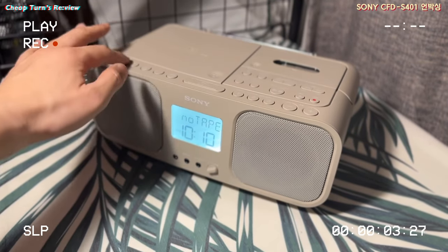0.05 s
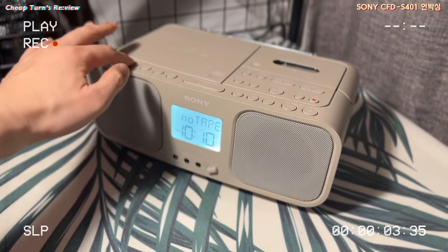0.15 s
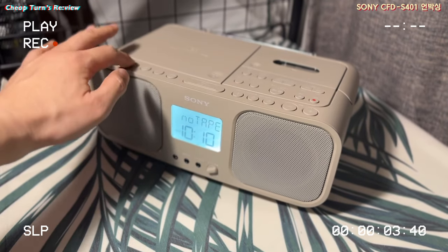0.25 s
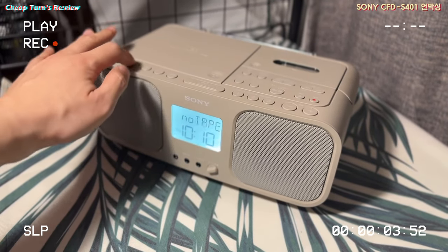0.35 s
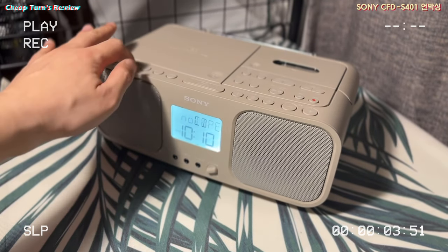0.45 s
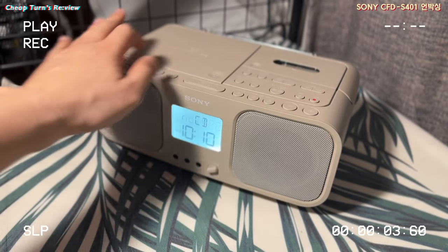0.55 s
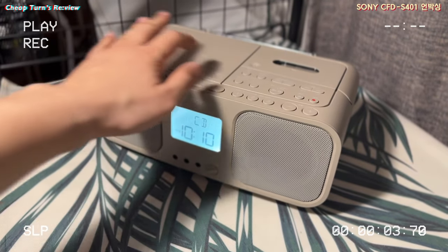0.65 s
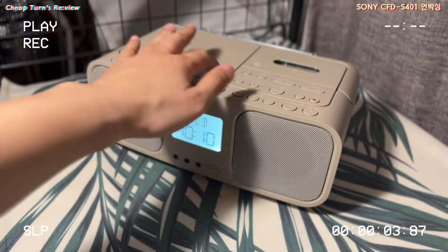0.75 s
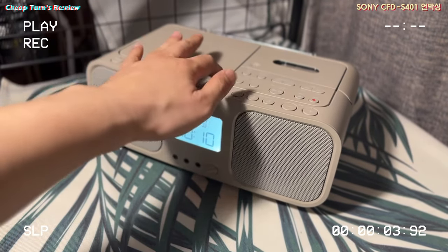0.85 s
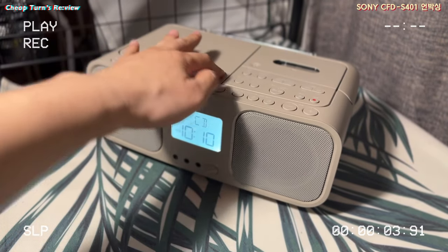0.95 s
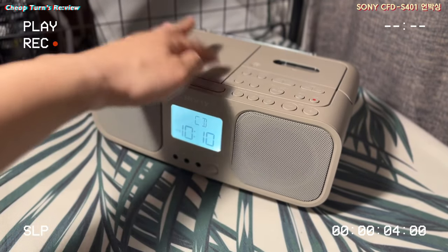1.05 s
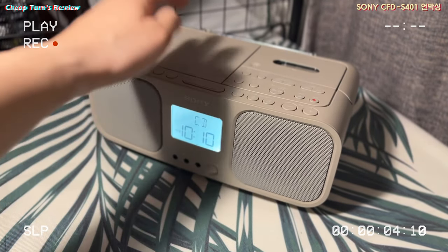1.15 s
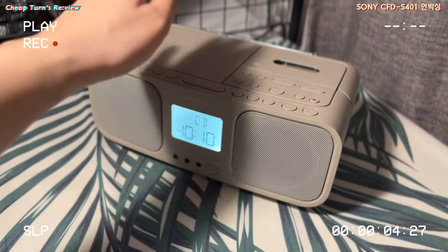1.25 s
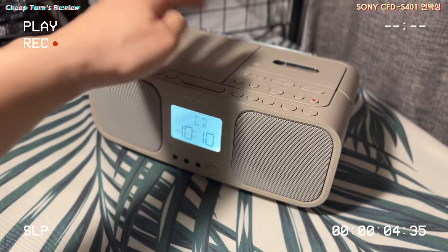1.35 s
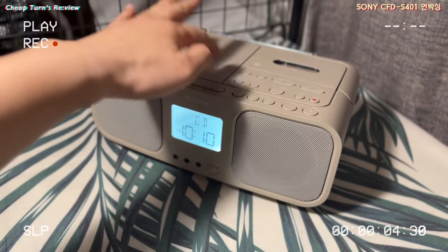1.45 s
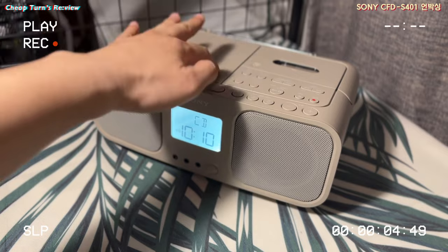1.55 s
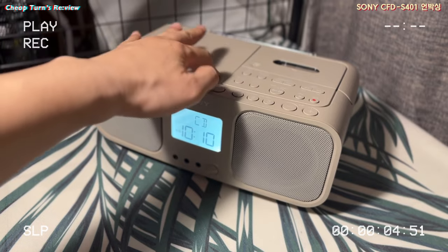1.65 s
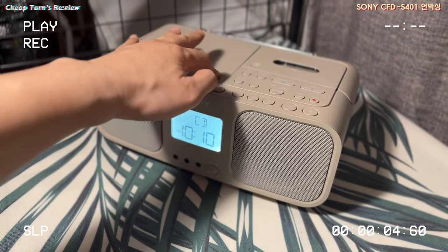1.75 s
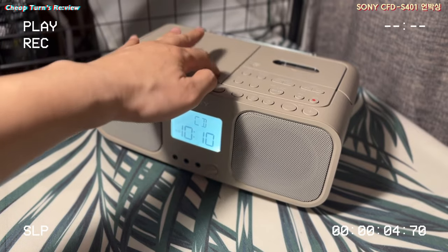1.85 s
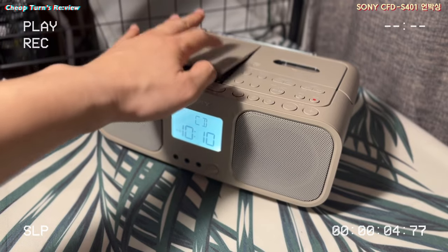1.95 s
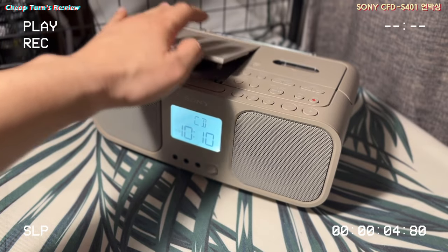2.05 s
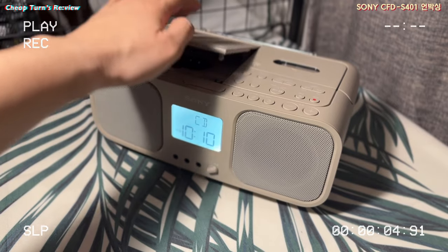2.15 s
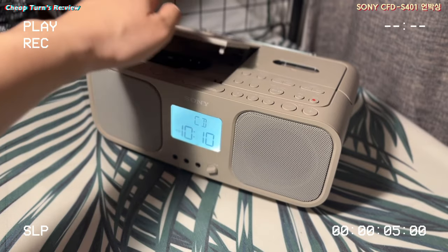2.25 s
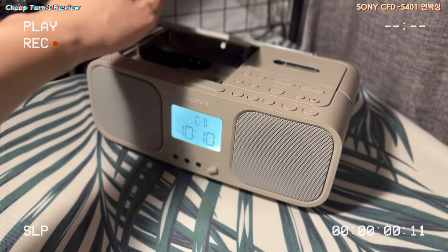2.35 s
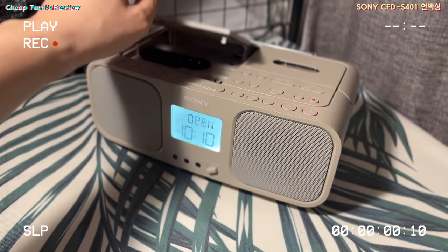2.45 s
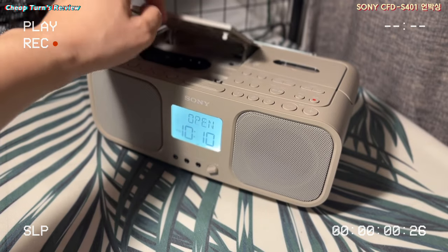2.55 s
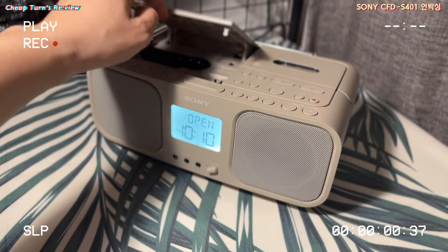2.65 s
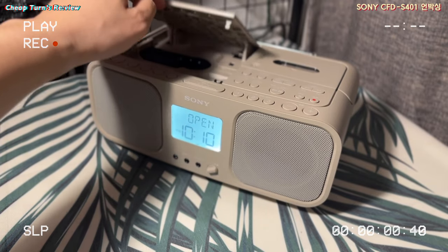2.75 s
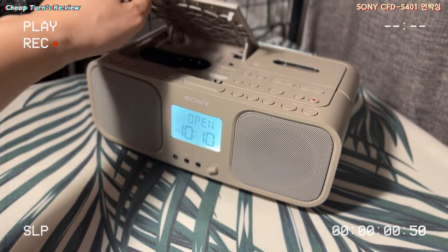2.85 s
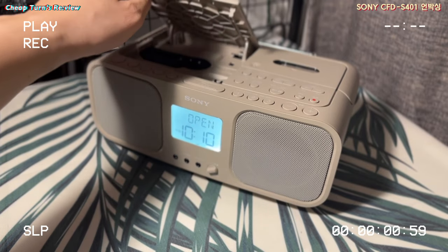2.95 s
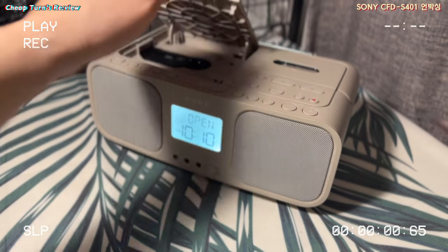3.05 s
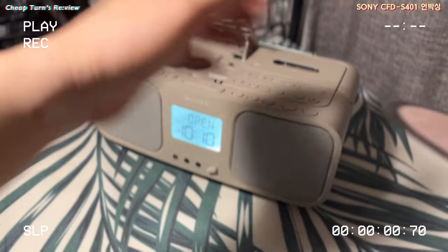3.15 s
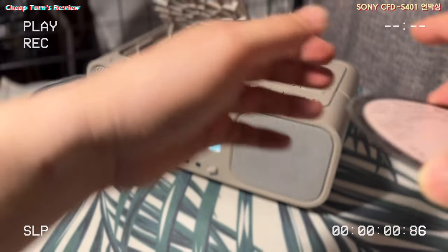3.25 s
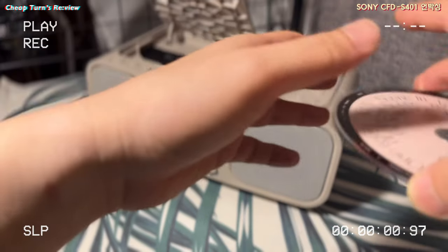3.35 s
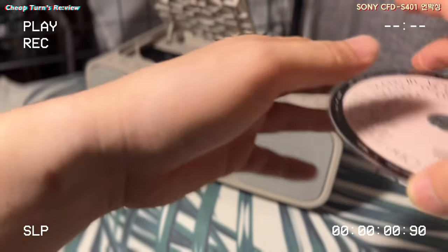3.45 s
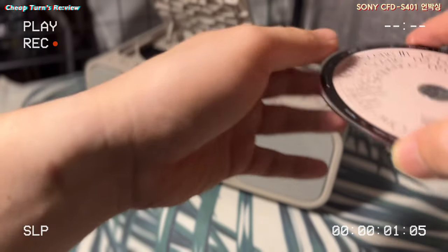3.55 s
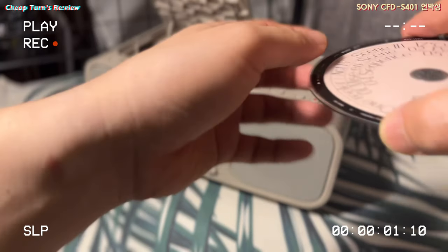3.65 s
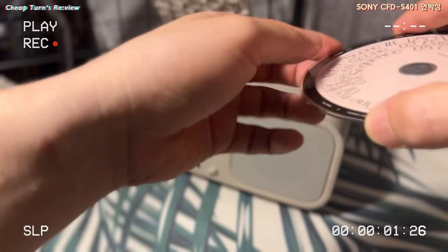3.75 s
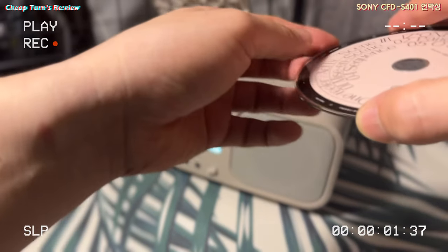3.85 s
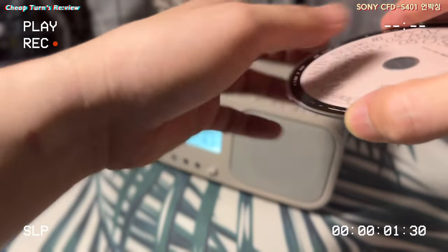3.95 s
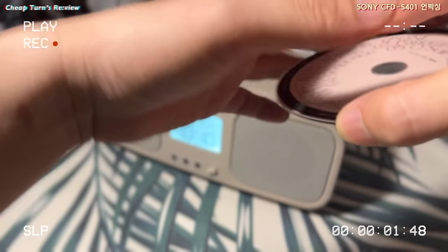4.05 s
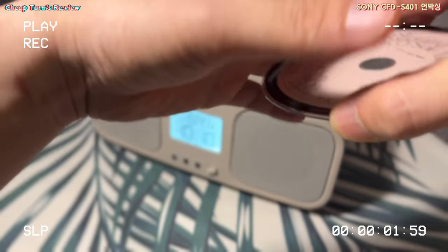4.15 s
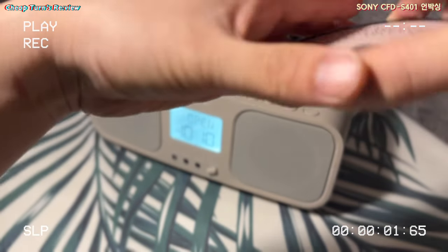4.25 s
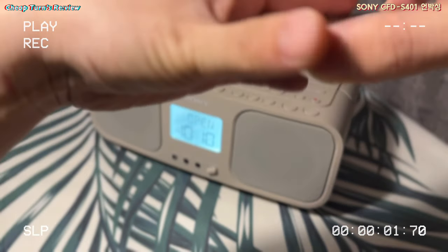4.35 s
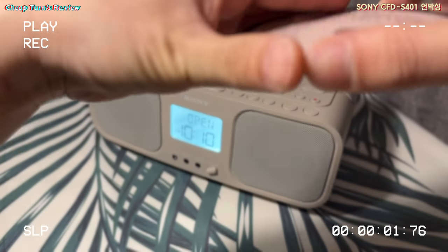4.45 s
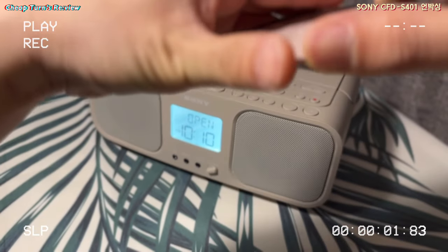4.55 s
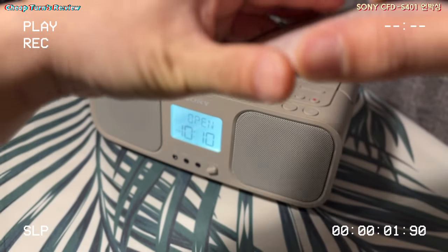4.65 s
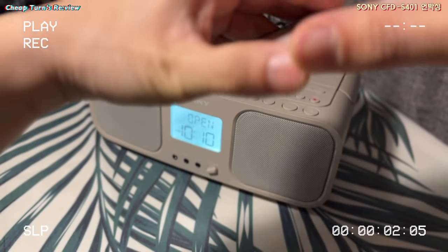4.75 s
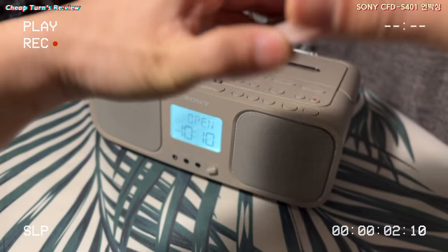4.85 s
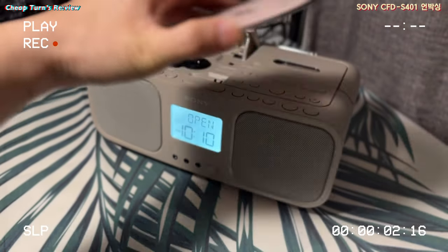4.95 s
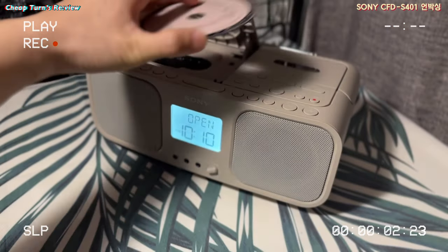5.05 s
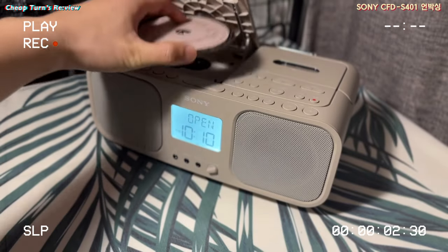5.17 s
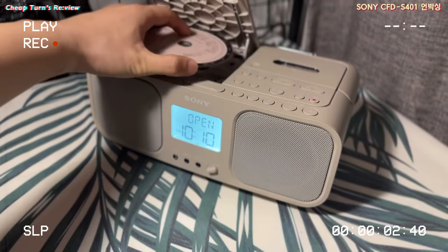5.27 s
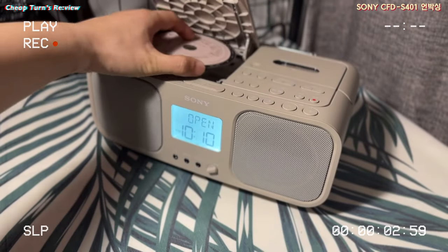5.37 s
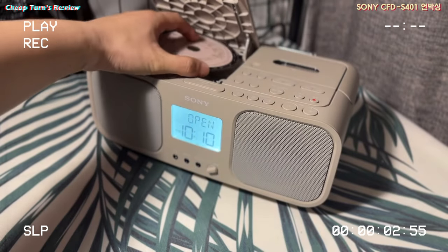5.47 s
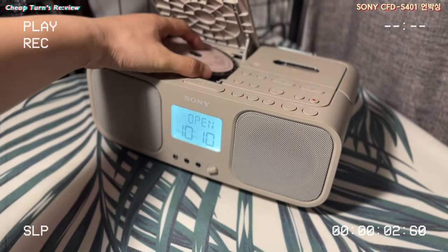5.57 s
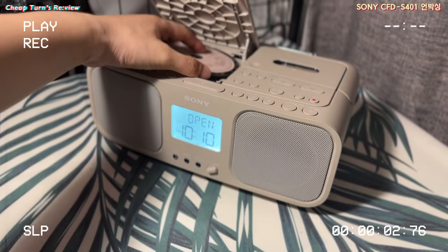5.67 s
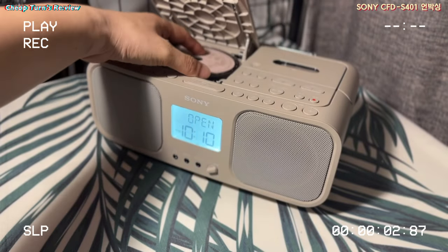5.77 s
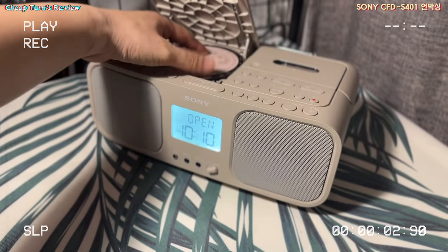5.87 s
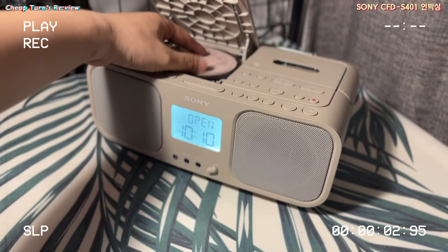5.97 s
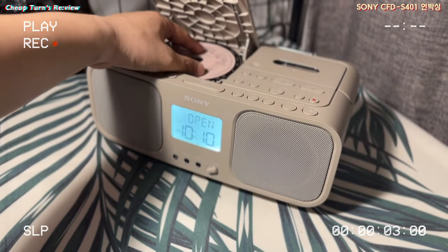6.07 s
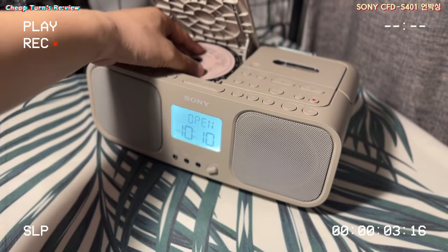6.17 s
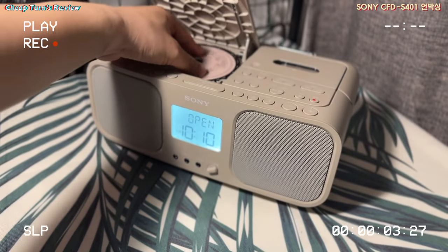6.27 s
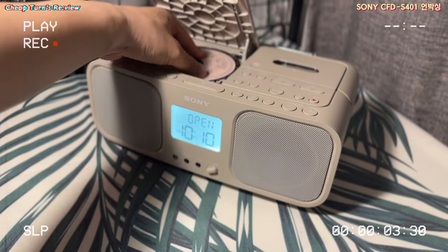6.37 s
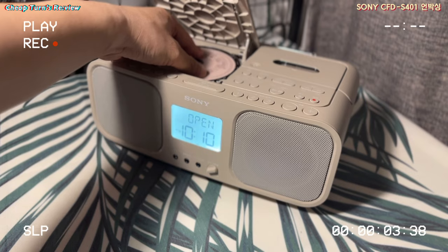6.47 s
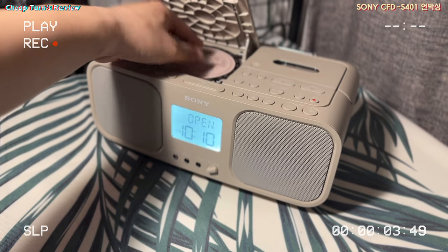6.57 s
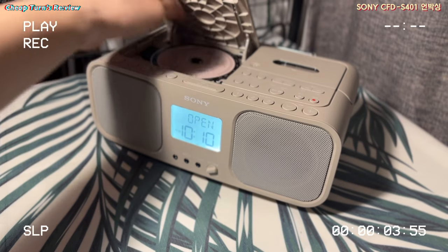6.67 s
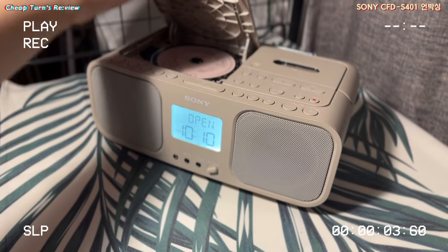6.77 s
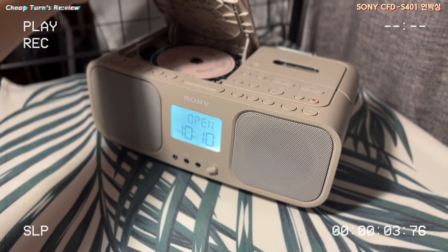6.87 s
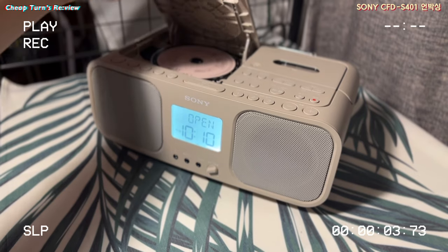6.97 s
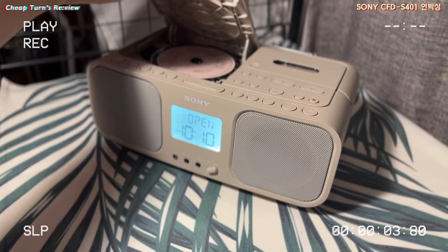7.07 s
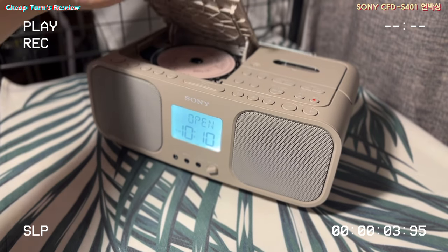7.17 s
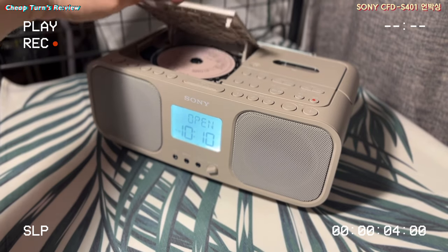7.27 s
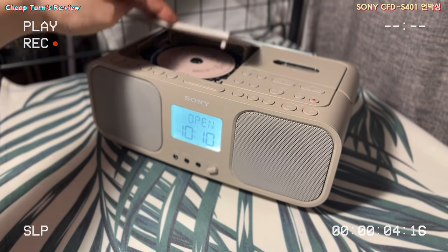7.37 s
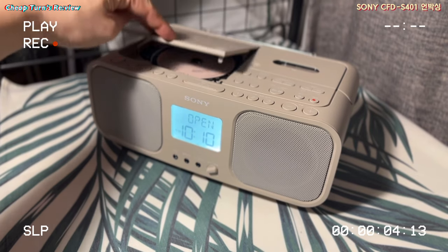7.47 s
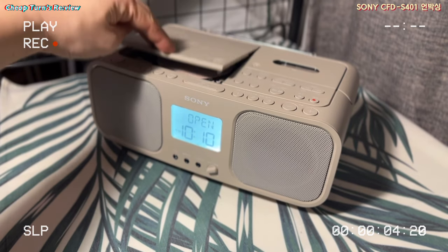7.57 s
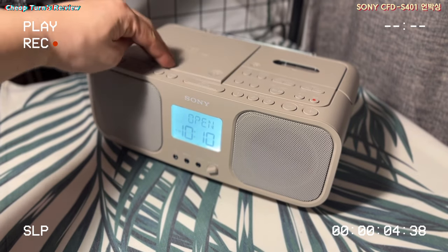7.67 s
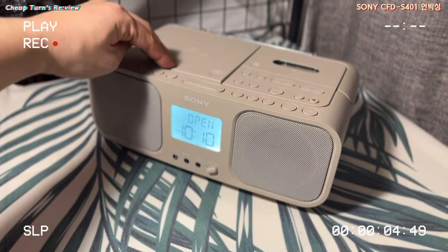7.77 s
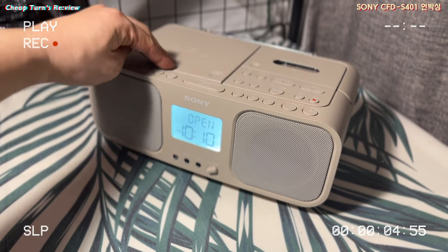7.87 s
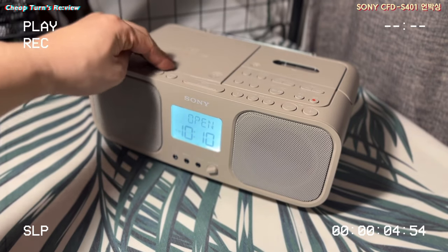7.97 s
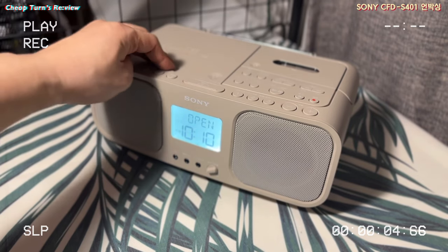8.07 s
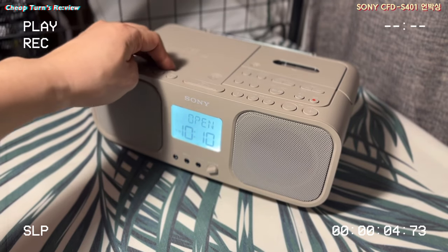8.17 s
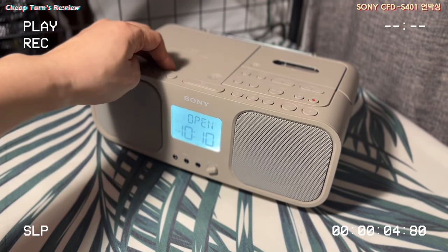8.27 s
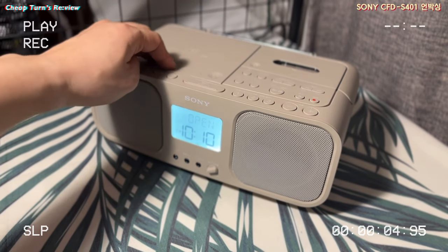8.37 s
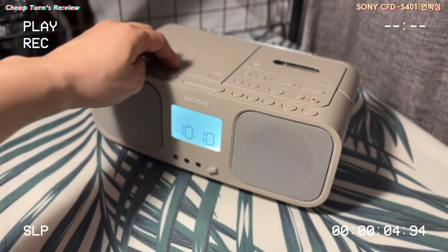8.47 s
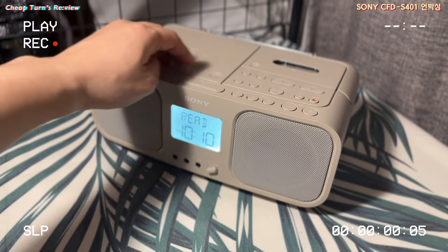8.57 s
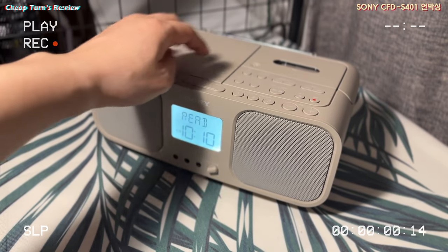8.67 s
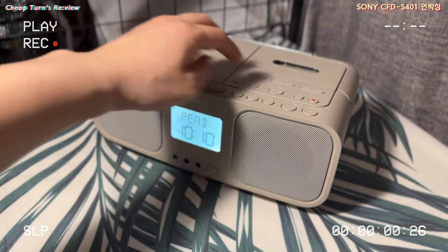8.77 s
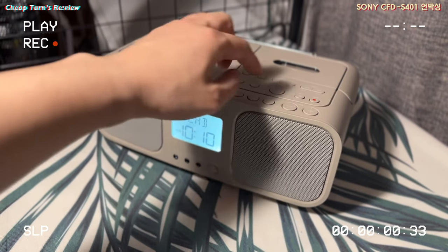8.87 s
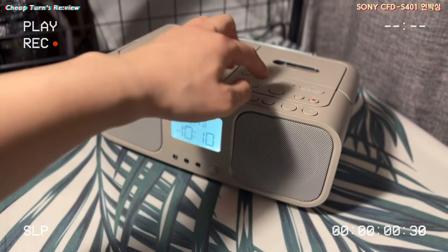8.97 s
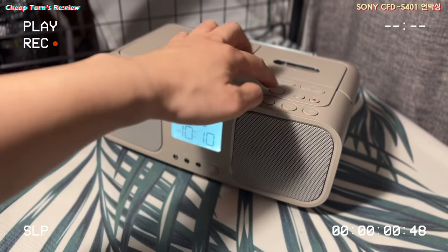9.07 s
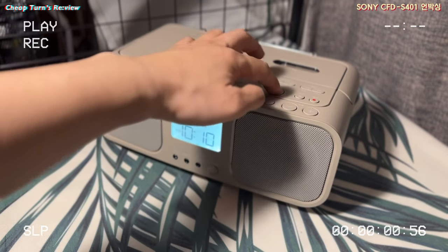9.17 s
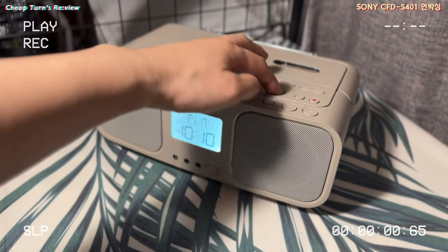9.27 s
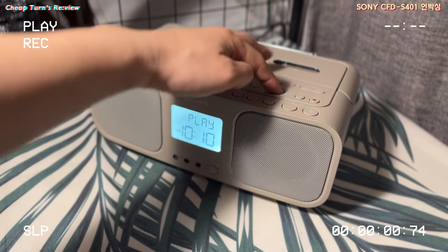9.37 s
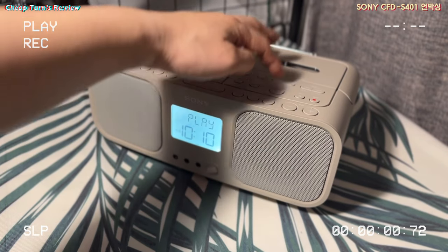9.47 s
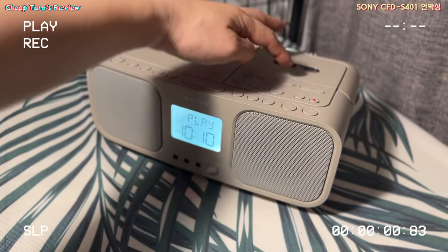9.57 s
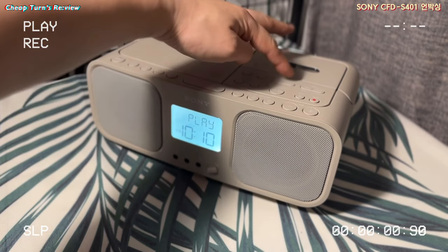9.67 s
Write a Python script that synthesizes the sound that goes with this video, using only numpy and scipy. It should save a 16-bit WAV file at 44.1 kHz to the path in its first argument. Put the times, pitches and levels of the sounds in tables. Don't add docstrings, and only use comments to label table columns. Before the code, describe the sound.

Close plastic handling in a small soft room: dull knocks, a scrape, disc clatter, one strong snap, lid clacks, then a firm button press.

```python
import sys
import numpy as np
from scipy import signal
from scipy.fft import rfft, irfft, next_fast_len
from scipy.io import wavfile
from scipy.ndimage import uniform_filter1d

SR = 44100
rng = np.random.default_rng(int(sys.argv[2]) if len(sys.argv) > 2 else 0)


def wrap_up_sound(samples):
    columns = np.atleast_2d(samples).T
    tamed = np.clip(columns, -1, 1)
    steps = np.round(tamed * 32767).astype(np.int16)
    wavfile.write(sys.argv[1], SR, steps)


def rack_gain(trim_db):
    fader = np.asarray(trim_db, float)
    return 10 ** (fader / 20)


N = 428635

# f/Hz, level/dB, T60/s
CASE_MODES = [(99, -4.5, 0.19), (160.4, -4.5, 0.18), (288, -9, 0.08), (477.4, -7.5, 0.077),
              (952.5, -3.5, 0.065), (1060, -9, 0.032), (1854, 0, 0.013), (2039, -8.5, 0.11),
              (2698, -12.5, 0.074)]
# f/Hz, level/dB, T60/s
GRILLE_MODES = [(294, -12, .05), (1228, -15, 0.035), (1844, 1, 0.032), (2022, 1, 0.028), (2556, -1.5, 0.03)]


def rms_one(x):
    return x / np.sqrt(np.mean(x ** 2) + 1e-20)


def at_hz(points, hz):
    p = np.array(points, float)
    return np.interp(np.log(np.maximum(hz, 1)), np.log(np.maximum(p[:, 0], 1)), p[:, 1])


def in_time(rows):
    rows = np.array(rows)
    return np.interp(np.arange(N) / SR, rows[:, 0], rows[:, 1])


def shaped(x, gain_at):
    size = next_fast_len(N, real=True)
    spectrum = rfft(x, size) * gain_at(np.fft.rfftfreq(size, 1 / SR))
    return irfft(spectrum, size)[..., :N]


def flicker(rate_hz):
    points = rng.standard_normal(2000)
    return np.interp(np.arange(N) / SR * rate_hz, np.arange(2000), points)


def stereo_noise(spectrum):
    # f/Hz, left-right correlation
    likeness = [(60, .99), (130, .96), (290, .82), (640, .4), (1400, .1), (3000, .1), (6800, -.3),
                (8400, -.5), (9600, .4), (11000, .9), (15000, .8)]
    signs = np.array([[1], [-1]])

    def mid_side_gain(hz):
        return rack_gain(at_hz(spectrum, hz)) * np.sqrt(1 + signs * at_hz(likeness, hz))

    mid, side = shaped(rng.standard_normal((2, N)), mid_side_gain)
    return (mid + signs * side) / np.std(mid)


def ring(knocks, hz, t60):
    radius = rack_gain(-60 / (min(t60, .15) * SR))
    w = 2 * np.pi * hz / SR
    return signal.lfilter([0, np.sin(w)], [1, -2 * radius * np.cos(w), radius ** 2], knocks)


def strokes(table):
    t = np.arange(N) / SR
    total = 0
    for s, db, swell, fade in table:
        away = np.maximum((s - t) / max(swell, .002), (t - s) / max(fade, .002))
        total = total + rack_gain(db - 20 * away)
    return total


def contacts(table, modes, spread_db, thump_tone_db, tone_db, tick_db, blow_db):
    # lower f/Hz, upper f/Hz
    layer_edges = [(70, 800), (750, 3000), (3000, 8000), (8000, 15000)]
    shell_t60 = [0.28, 0.093, 0.08, 0.025]
    swell_s = [.003, 0.0045, 0.0017, 0.00035]
    crack_db = [-23.5, -2, 8, 15.5]
    tick_per_hardness = 1.2
    out, t = np.zeros(N + SR), np.arange(SR // 5) / SR
    splits = [signal.butter(2, e, "band", fs=SR, output="sos") for e in layer_edges]
    tonal = rack_gain([thump_tone_db, tone_db, -90, -90])
    for s, db, weight_db, hard_db, rattle in table:
        sizes = rng.standard_normal(len(t)) * rack_gain(2.6 * rng.exponential(1, len(t)))
        knocks = rms_one(sizes) * rack_gain(-30 * t / max(rattle, .002)) + 1e-12
        strengths = rng.normal(0, 1, len(modes)) * spread_db
        crowd = rng.standard_normal(len(t))
        struck = knocks + rack_gain(blow_db) * (t == 0)
        tones = sum(rack_gain(mode_db + own_db) * ring(struck, hz, t60)
                    for (hz, mode_db, t60), own_db in zip(modes, strengths))
        at = round(s * SR) - 10
        layer_db = (weight_db, 0, hard_db, tick_per_hardness * hard_db + tick_db)
        for k, rel_db in enumerate(layer_db):
            leak = rack_gain(-120 / (shell_t60[k] * SR))
            stored = np.sqrt(signal.lfilter([1], [1, -leak], knocks ** 2))
            shape = stored / stored.max() + rack_gain(crack_db[k] - 60 * t / 0.019)
            small_modes = signal.lfilter([1], [1, -.6], crowd * shape)
            dense = rms_one(signal.sosfilt(splits[k], small_modes))
            layer = dense + tonal[k] * rms_one(signal.sosfilt(splits[k], tones))
            layer = signal.sosfilt(splits[k], layer * np.minimum(1, t / swell_s[k]))
            out[at:at + len(t)] += rack_gain(db + rel_db) * layer / np.abs(layer).max()
    return out[:N]


def house():
    # t/s, level/dB
    rumble_level = [(0.0, -58.5), (0.51, -65), (1.11, -59), (1.46, -70.5), (1.65, -58), (2.68, -66),
                    (3.92, -60.5), (4.68, -64), (5.71, -57), (6.63, -59.5), (6.98, -62), (7.36, -56),
                    (7.5, -57), (8.5, -60), (9.04, -62.5), (9.72, -55.5)]
    # f/Hz, level/dB per Hz
    deep_spectrum = [(22, -47), (32, -28), (42, -13.5), (52, 3.5), (58, 7.5), (68, -1.5), (80, -10),
                     (96, 0.5), (118, -11), (140, -17.5), (200, -62)]
    # t/s, level/dB
    drone_level = [(0.0, -72), (2.17, -77.5), (4.52, -63), (5.2, -66), (5.58, -60), (6.47, -69.5),
                   (8.47, -58), (8.77, -64.5), (9.72, -60)]
    # f/Hz, level/dB per Hz
    hiss_spectrum = [(150, -18.5), (200, -6), (300, -10.5), (600, -19), (1000, -27), (2000, -32),
                     (5000, -35.5), (7000, -45.5), (10000, -44.5), (12900, -49), (13700, -66),
                     (14200, -89.5)]
    deep = rack_gain(in_time(rumble_level) + 4.0 + 2.3 * flicker(5)) * stereo_noise(deep_spectrum)
    drone_hz, width_hz = 151, 33
    hump = [(drone_hz - 2 * width_hz, -40), (drone_hz - width_hz / 2, -8), (drone_hz, 0),
            (drone_hz + width_hz / 2, -8), (drone_hz + 2 * width_hz, -16), (400, -60)]
    drone = rack_gain(in_time(drone_level) + 2.0 + 2.5 * flicker(11)) * stereo_noise(hump)
    whine = rack_gain(-101) * np.sin(2 * np.pi * 2070 * np.arange(N) / SR)
    return deep + drone + rack_gain(-74.5) * stereo_noise(hiss_spectrum) + whine


def grille_touches():
    # t/s, level/dB, rattle/s
    on_grille = [(0.0263, -63.5, 0.029), (0.1, -60.5, 0.072), (0.5174, -62, 0.04), (0.6887, -66.5, 0.061),
                 (0.751, -73, 0.04), (1.467, -69, 0.054), (1.5076, -74, 0.056), (1.991, -70, 0.078),
                 (2.9034, -56.5, 0.05), (8.2474, -62, 0.041), (9.0394, -69.5, 0.055)]
    weight_db, hardness_db = -17, -14
    touches = [(s, db, weight_db, hardness_db, rattle) for s, db, rattle in on_grille]
    return contacts(touches, GRILLE_MODES, spread_db=-1.5, thump_tone_db=1.0, tone_db=7, tick_db=-4, blow_db=13)


def brushing():
    brush_strokes = [(1.92, -78.5, 0.01, 0.03), (1.97, -86.5, 0.057, 0.1), (0.1, -91, 0.03, 0.06),
                     (0.8, -91, 0.05, 0.05), (1.54, -89, 0.06, 0.032), (2.75, -88, 0.067, 0.37),
                     (2.905, -72, 0.019, 0.014), (4.136, -76.5, 0.05, 0.07), (4.666, -81.5, 0.026, 0.06),
                     (4.89, -87.5, 0.18, 0.043), (5.09, -98.5, 0.3, 0.1), (5.22, -91, 0.25, 0.15),
                     (5.4, -77, 0.095, 0.064), (5.47, -79, 0.01, 0.18), (6.742, -60, 0.032, 0.006),
                     (7.274, -85, 0.048, 0.085), (7.447, -73, 0.0044, 0.02), (9.5, -98, 0.095, 0.08),
                     (9.612, -102, 0.061, 0.04)]
    # f/Hz, level/dB per Hz
    brush_colour = [(500, -2.5), (2000, -3.5), (5000, -11.5), (8000, -5.5), (12000, -2.5), (15500, -4.5)]
    level = strokes(brush_strokes)
    grains = rng.standard_normal(N) * rack_gain(2.0 * flicker(360))
    hiss = rms_one(shaped(grains, lambda hz: rack_gain(at_hz(brush_colour, hz))))
    return rack_gain(9) * uniform_filter1d(level, size=600) * hiss


def case_knocks():
    # t/s, knock peak level/dB, thump weight/dB, snap hardness/dB, rattle/s
    on_case = [
        (0.268, -41, -20, -22, 0.014),
        (0.481, -51, 2.5, -6, 0.018),
        (0.852, -41.5, 1, -20.5, 0.039),
        (0.871, -49.5, 7.5, -8.5, 0.013),
        (1.004, -66, 8, -8, 0.05),
        (1.026, -49, 10, -18.5, 0.016),
        (1.56, -43.5, 4, -23.5, 0.026),
        (1.634, -54.5, 8, -8, 0.12),
        (1.662, -44, 1, 13, 0.017),
        (1.8795, -38, -1, 7.5, 0.029),
    ]
    return contacts(on_case, CASE_MODES, spread_db=-3.0, thump_tone_db=4.5, tone_db=-3.5, tick_db=2.0, blow_db=21.5)


def scraping():
    drags = [
        (1.872, -36, 0.019, 0.01),
        (1.93, -66.5, 0.005, 0.11),
        (5.39, -62, 0.041, 0.12),
        (5.44, -66, 0.02, 0.005),
        (5.47, -54, 0.004, 0.14),
        (5.81, -50.5, 0.005, 0.15),
        (5.87, -43, 0.034, 0.12),
        (7.3, -74, 0.06, 0.17),
        (7.447, -76, 0.004, 0.03),
    ]
    # f/Hz, level/dB, T60/s
    scraped_modes = [(362, 0, .09), (558, -1.5, 0.11), (870, -3, 0.034), (1230, -9, 0.029),
                     (1760, -7.5, .04), (2140, -8, .04), (2630, -5.5, 0.012), (3220, -7.5, 0.011),
                     (4200, -8.5, .01), (5450, -13.5, .008)]
    level = strokes(drags)
    is_slip = rng.random(N) < 900 / SR
    slips = is_slip * rng.standard_normal(N) * rack_gain(1.6 * rng.exponential(1, N)) + 1e-12
    rung = rms_one(sum(rack_gain(db) * ring(slips, hz, t60) for hz, db, t60 in scraped_modes))
    grit = rms_one(signal.lfilter([1, -1], [1, -1.5, .56], rng.standard_normal(N)))
    return rack_gain(-4.5) * uniform_filter1d(level, size=300) * (rung + rack_gain(-14) * grit)


def latch():
    # t/s, knock peak level/dB, thump weight/dB, snap hardness/dB, rattle/s
    on_latch = [
        (1.979, -71, -9, 7, 0.018),
        (2.004, -74, -9, 5, 0.02),
        (2.678, -37, -8, -13.5, 0.04),
        (8.178, -32.5, -26, -11, 0.0034),
    ]
    return contacts(on_latch, GRILLE_MODES, spread_db=4.0, thump_tone_db=-6, tone_db=4.5, tick_db=0.0, blow_db=19.5)


def disc_knocks():
    # t/s, knock peak level/dB, thump weight/dB, snap hardness/dB, rattle/s
    on_disc = [(5.448, -42.5, -3.5, -16.5, 0.062), (5.562, -48.5, -9.5, -11, 0.02),
               (5.626, -46, -17, -14.5, 0.06), (5.681, -29.5, -3.5, -11, 0.053), (5.702, -32, 6, 1, 0.032),
               (5.778, -33, -10.5, -13.5, 0.037), (5.8, -47.5, 6, -10, 0.022), (5.822, -43, 7, -9.5, 0.021),
               (5.854, -36.5, -3, -1, 0.045), (5.881, -34, -7, -3.5, 0.019), (5.924, -44, -18, -7, 0.02),
               (5.954, -54, 10, -9, 0.016), (5.984, -33, 7.5, -4, 0.0079), (6.056, -49, -12.5, -9.5, 0.019),
               (6.233, -59, 13.5, -5.5, 0.03), (6.303, -56, -3.5, -11.5, 0.1)]
    # f/Hz, level/dB, T60/s
    disc_modes = [(363, 11.5, 0.15), (457.2, 4, .06), (586, -2, 0.063), (1220, -10, .04),
                  (1500, -7.5, 0.041), (1760, -7, 0.068), (2120, -9.5, .05), (2550, -11.5, .05)]
    return contacts(on_disc, disc_modes, spread_db=6, thump_tone_db=14, tone_db=4, tick_db=3.0, blow_db=20.5)


def hub_snap():
    # t/s, knock peak level/dB, thump weight/dB, snap hardness/dB, rattle/s
    on_hub = [
        (6.341, -12, 2.8, -6.5, 0.011),
    ]
    # f/Hz, level/dB, T60/s
    hub_modes = [(89.5, -9.5, 0.061), (312, -4, 0.05), (386, -2.5, 0.077), (447, 3.5, 0.11),
                 (553, 1.5, 0.058), (590, 3.5, .045), (653, 1, .06), (770, -3.5, .05), (857, -5, .05),
                 (1230, -3, .04), (1303, -1.5, .05), (1780, -8.5, 0.03)]
    return contacts(on_hub, hub_modes, spread_db=1, thump_tone_db=19, tone_db=6.5, tick_db=9, blow_db=29)


def lid_knocks():
    # t/s, knock peak level/dB, thump weight/dB, snap hardness/dB, rattle/s
    on_lid = [(6.49, -56, 5, -15, 0.038), (6.71, -46.5, 1, -14, 0.036), (6.748, -32.5, -3, -12.5, 0.037),
              (6.774, -32.5, -1.5, -11, 0.016), (6.95, -53.5, 5.5, -27, 0.051),
              (7.024, -59, 12.5, -26, 0.028), (7.255, -73.5, 17, -13, 0.035), (7.624, -62.5, -25, 1, 0.02),
              (7.641, -43, -4, 2.5, 0.025), (7.848, -51.5, 1.5, -34, 0.024), (8.02, -47, -10, -10.5, 0.035),
              (8.113, -48, 0.5, 13.5, 0.022), (8.307, -62.5, 12.5, -12, 0.1), (8.336, -37, 4.5, 4, 0.023),
              (8.418, -56, -6, -4, 0.015), (8.497, -68, 11.5, -4, 0.039)]
    return contacts(on_lid, CASE_MODES, spread_db=4.0, thump_tone_db=-1, tone_db=-4, tick_db=4.5, blow_db=20.5)


def key_press():
    # t/s, knock peak level/dB, thump weight/dB, snap hardness/dB, rattle/s
    on_key = [
        (9.12, -45.5, -7.5, -19, 0.07),
        (9.177, -26, -12.5, -17, 0.011),
        (9.398, -28.5, -4, -14.5, 0.038),
    ]
    # f/Hz, level/dB, T60/s
    key_modes = [(519, -1, 0.077), (794, -20.5, 0.12), (904, 13.5, 0.025), (1170, 18, 0.019),
                 (1330, 9, 0.016), (2010, -12, 0.017)]
    return contacts(on_key, key_modes, spread_db=11.0, thump_tone_db=4, tone_db=0.5, tick_db=-6, blow_db=21)


def ports(x):
    # f/Hz, left minus right level/dB
    tilt = [(100, -1.5), (500, 1), (2000, 1), (5000, 6), (8000, 5), (15000, -3.5)]
    # f/Hz, phase by which left leads/rad
    lead = [(100, 0), (500, .8), (1200, .5), (2200, 1.0), (3500, .6), (6800, -1.6), (8400, -3.1),
            (9600, -4.4), (10600, -5.5), (12700, -6.7), (14800, -8.6)]
    half = np.array([[.5], [-.5]])
    return shaped(x, lambda hz: rack_gain(half * at_hz(tilt, hz)) * np.exp(1j * half * at_hz(lead, hz)))


def room(x):
    # f/Hz, T60/s
    room_t60 = [(150, 0.53), (1000, .3), (4000, 0.23), (14000, 0.16)]
    t = np.arange(SR // 2) / SR
    edges, tail = np.geomspace(80, 16000, 9), 0
    for low, high in zip(edges, edges[1:]):
        split = signal.butter(2, [low, high], "band", fs=SR, output="sos")
        band = signal.sosfilt(split, rng.standard_normal((2, len(t))))
        tail = tail + band * rack_gain(-60 * t / at_hz(room_t60, np.sqrt(low * high)))
    tail = tail * np.clip(t / 0.004 - .3, 0, 1)
    tail = tail / np.sqrt(np.sum(tail ** 2) / 2)
    return signal.fftconvolve(x[None], tail, axes=1)[:, :N]


def scene():
    near = grille_touches() + brushing() + case_knocks() + scraping() + latch()
    near = near + disc_knocks() + hub_snap() + lid_knocks() + key_press()
    return ports(near) + rack_gain(-17) * room(near) + house()


def roll_off(x):
    return signal.sosfilt(signal.butter(12, 16530, fs=SR, output="sos"), x)


def record(dry):
    # f/Hz, level/dB
    mic_top = [(13500, 0.5), (14500, -2), (15500, -7.5), (16500, -16.5)]
    # f/Hz, level/dB
    sum_shelf = [(7400, -0.5), (8000, -1), (8500, -2.5), (9000, -2.5), (9500, -2.5)]
    sums = np.array([dry[0] + dry[1], dry[0] - dry[1]]) / 2
    only_mid = np.array([[1], [0]])
    mid, side = shaped(sums, lambda hz: rack_gain(at_hz(mic_top, hz) + only_mid * at_hz(sum_shelf, hz)))
    return roll_off(np.array([mid + side, mid - side]))


dry = scene()
out = record(dry)
wrap_up_sound(out)
```